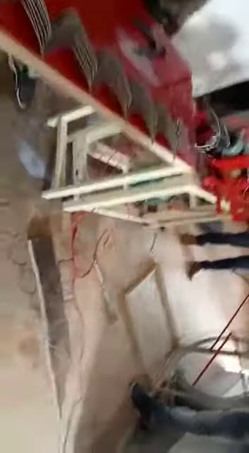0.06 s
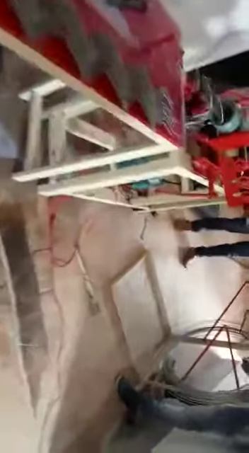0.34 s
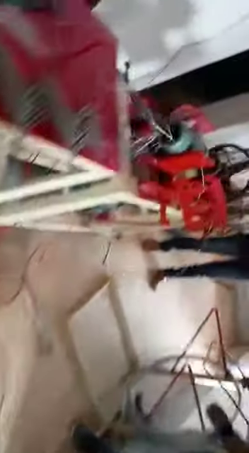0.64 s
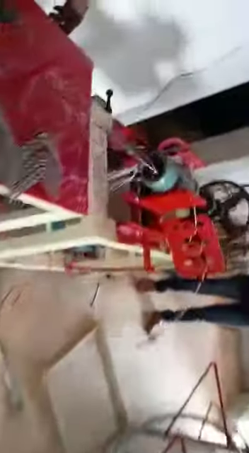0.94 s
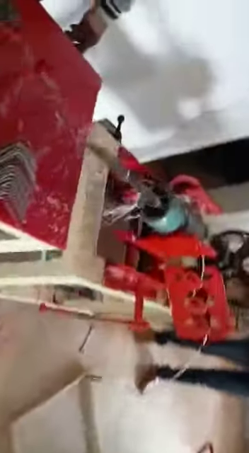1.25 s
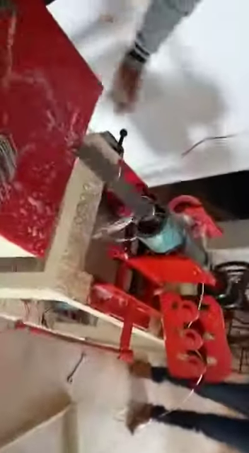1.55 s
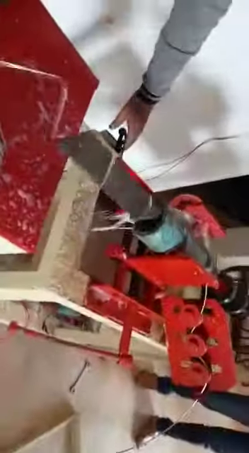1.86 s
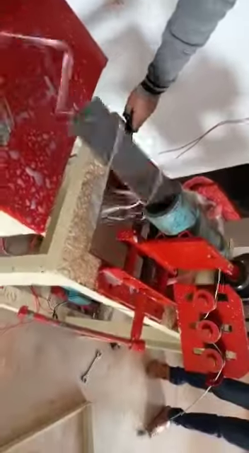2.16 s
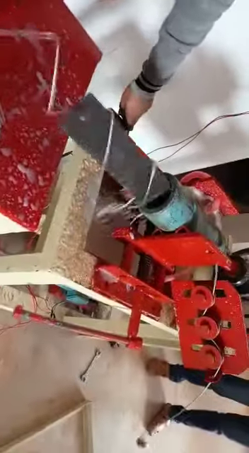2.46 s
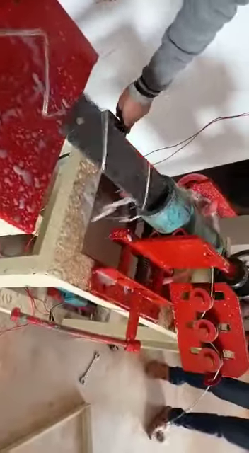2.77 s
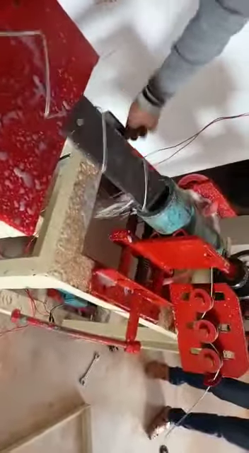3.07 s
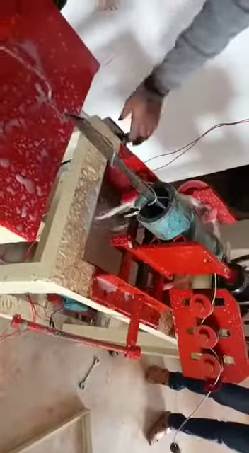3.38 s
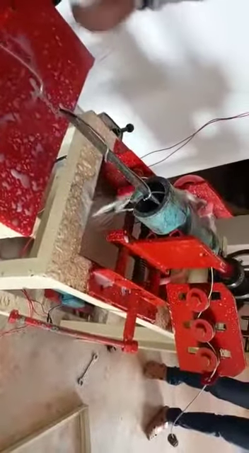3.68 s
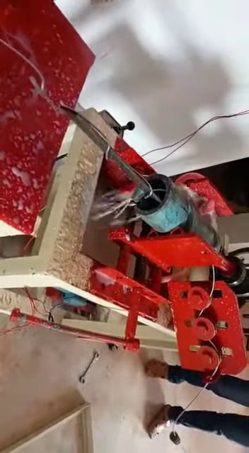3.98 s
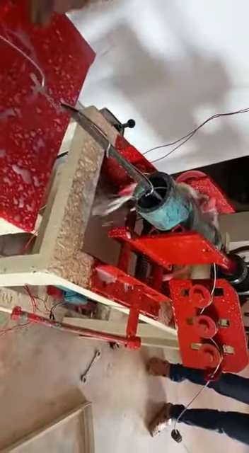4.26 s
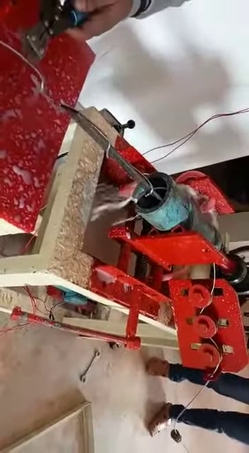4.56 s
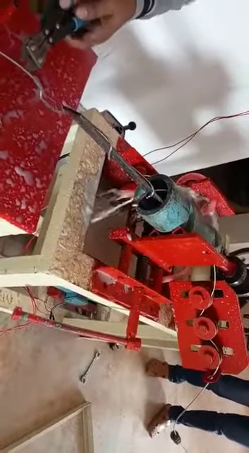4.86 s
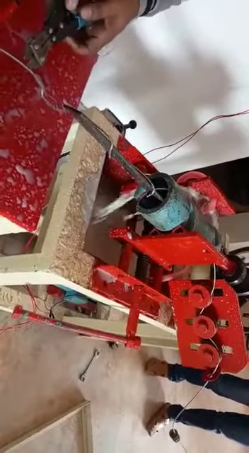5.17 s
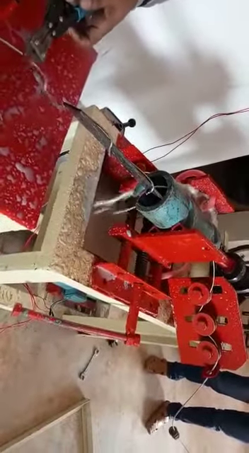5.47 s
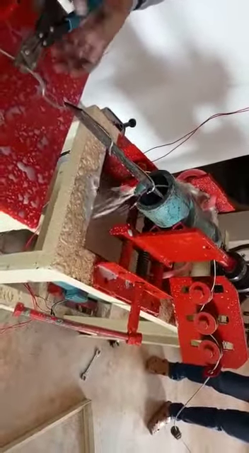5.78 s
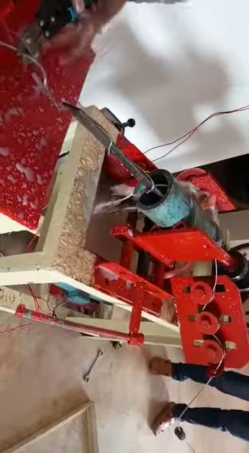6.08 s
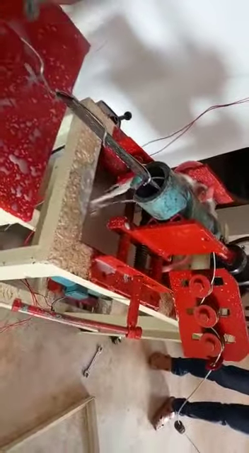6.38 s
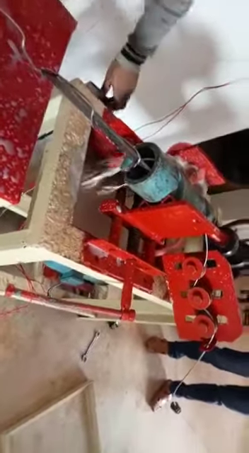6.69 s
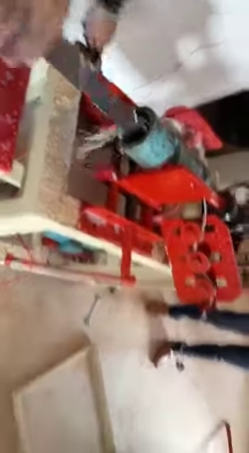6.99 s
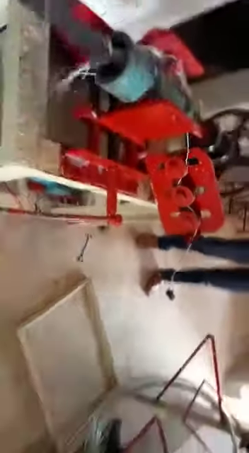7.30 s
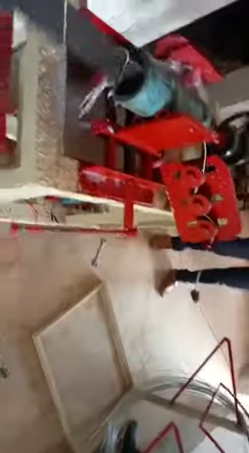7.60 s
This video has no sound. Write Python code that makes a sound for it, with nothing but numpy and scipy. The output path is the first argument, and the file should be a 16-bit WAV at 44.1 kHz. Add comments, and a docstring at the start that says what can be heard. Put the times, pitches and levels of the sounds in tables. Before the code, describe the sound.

A motor-driven wire fence machine is running from the start, about an arm's length away in a bare, slightly echoing workshop. Its steel frame clatters and booms over a low hum, while wire chatters, scrapes and slaps a turning blade with a bright ping nearly four times a second. At about 3.1 seconds the drive coasts down, with loose wire clinking until around 4 seconds. A quieter stretch follows: faint motor hum, steady hiss, light rattling and a few clinks near 4.5 and 5.6 seconds, with more around 6. At about 6.25 seconds a cutter snips the wire with one loud, sharp metallic crack. At 6.7 seconds the drive engages with a ringing clank and the hum swells. The clatter and regular pings return from about 7 seconds and carry on to the end, near 7.8 seconds.

```python
"""A chain-link fence machine

In a bare workshop, steel wire winds round a flat blade, an arm's length from a phone. On every turn
the wire slaps over the blade's edge and rattles, while the steel frame clatters and booms.
The drive is taken out of gear, the motor idles, the wire is handled and snipped, and a lever throws
the blade in again. A limiter briefly turns down the hardest blows."""
import sys
import numpy as np
from scipy import signal
from scipy.fft import rfft, irfft
from scipy.io import wavfile
from scipy.ndimage import uniform_filter1d, minimum_filter1d

SR = 44100
rng = np.random.default_rng(int(sys.argv[2]) if len(sys.argv) > 2 else 0)


def to_wav(sig):
    """Store sig (one row per channel, or 1-D mono) as 16-bit WAV at the path in sys.argv[1].

    Samples outside -1..1 are clipped; the rate is SR.
    """
    pcm = np.clip(np.atleast_2d(sig), -1, 1) * 32767
    pcm = np.round(pcm).astype(np.int16)
    wavfile.write(sys.argv[1], SR, pcm.T)  # frames by channels


N = 345744
T = np.arange(N) / SR

# How hard the drive shakes things: it runs, coasts down after 3.1 seconds and picks up again.
# Each row: time in seconds, then the levels in dB of frame clatter, table boom and wire chatter.
DRIVE_LEVELS = [(0.0, -24.5, -24.5, -25), (0.33, -25.5, -26, -23.5), (0.89, -24.5, -33, -22.5),
                (1.42, -24, -27.5, -20), (2.05, -25.5, -28, -24), (2.34, -21.5, -24.5, -23.5),
                (2.64, -28.5, -32, -24), (3.05, -25.5, -26, -21), (3.32, -31.5, -35.5, -26),
                (3.89, -33.5, -37.5, -26), (4.17, -41, -45.5, -34.5), (5.57, -48, -54.5, -34),
                (5.76, -31.5, -44, -33), (6.03, -39, -48, -35.5), (6.38, -34, -49, -27),
                (6.86, -24, -30, -22), (6.99, -29.5, -29.5, -29), (7.84, -26, -27.5, -25)]
# The wire slaps over the blade once a turn. Each row: start in seconds, ping pitch in Hz,
# ping level in dB, rattle level in dB, rattle fade time in seconds.
WIRE_SLAPS = [(0.078, 2920, -19, -15, 0.084), (0.361, 3180, -6.5, -14, 0.049),
              (0.635, 3130, -10.5, -15.5, 0.064), (0.914, 3026, -3, -17, 0.021),
              (1.182, 3130, -5.5, -14.5, 0.042), (1.456, 3520, -6.5, -16, 0.024),
              (1.735, 3160, -3.5, -13, 0.012), (2.006, 3320, -4.5, -14, 0.015),
              (2.286, 3260, -6, -16, 0.078), (2.560, 3004, -6.5, -4.5, 0.0063),
              (2.837, 3370, -5, -8, 0.015), (3.111, 2940, -4, -22, 0.029), (3.427, 3380, -14, -17, 0.039),
              (6.95, 3160, -17, -23, 0.036), (7.207, 3280, -7.5, -14.5, 0.037),
              (7.482, 3260, 0, -9.5, 0.0078), (7.763, 3204, -5, -10.5, 0.011)]
# Loose wire clinks against the table and the guides.
# Each row: start in seconds, ring level in dB, bright tick level in dB, fade time in seconds.
WIRE_CLINKS = [(0.096, -28, -36, 0.039), (0.232, -32, -34.5, 0.025), (0.420, -22, -36, 0.028),
               (0.468, -23, -28.5, 0.035), (1.141, -19, -31, 0.068), (1.195, -32, -28, 0.048),
               (1.256, -16, -31, 0.021), (1.454, -26, -25, 0.014), (1.478, -24, -23, 0.021),
               (1.662, -15.5, -28, 0.02), (1.703, -11.5, -31, 0.013), (1.845, -20, -28.5, 0.042),
               (1.963, -17, -26, 0.01), (2.302, -22, -19.5, 0.013), (2.367, -9.5, -38, 0.0046),
               (2.534, -19, -29, 0.016), (2.638, -18, -30, .02), (2.840, -33, -24, 0.035),
               (3.057, -33, -28, 0.011), (3.081, -20, -22, 0.01), (3.111, -10, -22, 0.035),
               (3.183, -13, -24, 0.033), (3.339, -21.5, -27, 0.045), (3.427, -11, -19, 0.029),
               (3.560, -20.5, -31.5, 0.062), (3.6, -15, -33, 0.049), (3.804, -20.5, -34, 0.025),
               (3.902, -15.5, -33, 0.031), (4.46, -22, -29.5, 0.041), (4.493, -16, -46, 0.036),
               (5.558, -19, -32, 0.038), (5.627, -11.5, -23, 0.031), (5.70, -25.5, -56, 0.15),
               (5.996, -17.5, -44, 0.013), (6.022, -17.5, -35, 0.031), (6.086, -18.5, -30, 0.045),
               (6.253, -20.5, -25.5, 0.11), (6.375, -22.5, -34, 0.077), (6.486, -20.5, -40, 0.033),
               (6.6665, -11.5, -29, 0.035), (6.726, -9.5, -22, 0.026), (6.769, -12.5, -26, 0.072),
               (6.948, -18.5, -31, 0.025), (7.283, -21, -27, 0.013), (7.330, -20.5, -33, 0.01),
               (7.452, -18, -36, 0.007), (7.562, -31, -32, 0.009)]
# The tone of wire hitting steel. Each row: frequency in Hz, level in dB.
CLINK_SPECTRUM = [(40, -38), (150, -50), (400, -27.5), (1400, -6), (2050, -4), (2500, 5.5), (3000, 5.5),
                  (3700, -2), (4400, -10.5), (5100, -18), (6100, -15.5), (7000, -4), (8200, -15),
                  (10000, -25), (15500, -30)]


def wire_chatter():
    """The wire chatters along the blade and its sleeve, harder after each slap."""
    # The tone of wire rattling in the sleeve. Each row: frequency in Hz, level in dB.
    sleeve_spectrum = [(200, -40), (1000, -16), (2000, -10.5), (2400, -4.5), (2900, 1.5), (3400, -2),
                       (3850, -10.5), (4400, -14.5), (5150, -42), (5700, -21.5), (7100, -13), (8000, -20),
                       (9500, -50), (16000, -40)]
    # The notes at which blade and sleeve ring. Each row: pitch in Hz, width in Hz, level in dB.
    blade_notes = [(2352, 120, 0), (2805, 35, -3), (3310, 22, -0.5), (3730, 140, -5.5), (5584, 79, -13.5),
                   (6610, 110, -16), (7150, 33, -13)]
    _, _, chatter_db = curves(DRIVE_LEVELS)
    slaps = bursts([(start, db, decay) for start, _, _, db, decay in WIRE_SLAPS], rise_s=0.0023)
    shake = np.hypot(undb(chatter_db + 2.3 * wander(40) - 2), undb(1.5) * slaps)
    sleeve = through(contacts(per_second=1800, spread_db=1.5) * shake, colour(sleeve_spectrum))
    blade = through(contacts(per_second=900, spread_db=3) * shake, resonances(blade_notes))
    rings = jangle(shake, count=600, low_hz=2269, high_hz=3886, decay_s=0.0074, spread_db=4)
    high_rings = jangle(shake, count=260, low_hz=5500, high_hz=6630, decay_s=0.009, spread_db=4)
    return undb(-1.5) * sleeve + undb(-6) * blade + rings + undb(-16) * high_rings


def wire_pings(rise_s=0.0013, damping_s=0.045):
    """The tight wire rings for a few milliseconds as it lands flat on the blade."""
    out, t = np.zeros(N), T[:SR // 20]
    swell = (t / rise_s) ** 2 * np.exp(-t / rise_s) * np.exp(-t / damping_s)
    swell /= swell.max()
    for start, hz, db, _, _ in WIRE_SLAPS:
        tones = [(hz, 0), (2440, -8), (hz * 1.14, -10)]  # pitch in Hz, level in dB
        ping = sum(undb(tone_db) * sine(tone_hz, t) for tone_hz, tone_db in tones)
        add(out, start, undb(db) * swell * ping)
    return out


def wire_tinks():
    """Now and then a free end of wire tinks or squeaks on the blade."""
    # Each row is one tink: start in seconds, pitch in Hz, level in dB, fade time in seconds.
    tinks = [(1.385, 3060, -11, 0.015), (1.616, 2980, -12, 0.022), (1.663, 3600, -3, 0.0036),
             (2.415, 2817, -7, .02), (2.975, 2850, -14, 0.034), (3.08, 2910, -8, 0.0045),
             (4.668, 3560, -20, 0.003), (5.452, 3600, -18, 0.002), (7.225, 2380, -18, .035),
             (7.563, 3770, -14.5, 0.0057)]
    out = np.zeros(N)
    for start, hz, db, decay in tinks:
        add(out, start, undb(db) * short_ring(hz, decay, rise_s=decay / 3))
    return out


def wire_clinks():
    """Loose wire hits steel once, then bounces in a short shower of tiny taps."""
    first_touch = bursts([(start, db, 0.003) for start, db, _, _ in WIRE_CLINKS], rise_s=0.00023)
    bounces = bursts([(start, db, decay) for start, db, _, decay in WIRE_CLINKS], rise_s=0.0041)
    taps = contacts(per_second=3000, spread_db=0) * np.hypot(undb(-0.5) * first_touch, bounces)
    return undb(2) * through(taps, colour(CLINK_SPECTRUM))


def wire_scrapes():
    """Wire scratches brightly at each clink, and as it drags and slips through its guides."""
    # The wire is pulled along. Each row: start in seconds, end in seconds, level in dB.
    pulls = [(0.09, 0.85, -40), (0.92, 2.25, -40), (2.63, 2.72, -40.5), (2.86, 3.2, -43.5),
             (3.53, 3.44, -48), (6.28, 6.53, -54), (6.75, 6.88, -50), (7.18, 7.34, -44), (7.72, 7.84, -49)]
    # The tone of a sharp scratch on steel. Each row: frequency in Hz, level in dB.
    scratch_spectrum = [(2000, -41), (5100, -13), (5700, 6.5), (7000, 9.5), (8200, 1.5), (9300, -1.5),
                        (12500, 1.5), (14000, -1), (15500, -2.5)]
    ticks = bursts([(start, db, decay) for start, _, db, decay in WIRE_CLINKS], rise_s=0.00022)
    slip_rows = [(when * T[-1], 16 * size, 0.009) for when, size in rng.random((210, 2))]
    slips = unit(bursts(slip_rows, rise_s=0.00044))
    drag = np.hypot(undb(2.5) * slips, undb(1.5))  # sudden slips on top of a steady rub
    force = np.hypot(undb(2) * ticks, spells(pulls, attack_s=0.017, release_s=0.1) * drag)
    scratch = through(contacts(per_second=1500, spread_db=-1.5) * force, colour(scratch_spectrum))
    sparkle = jangle(force, count=2000, low_hz=5400, high_hz=15000, decay_s=0.002, spread_db=4)
    return undb(0.3) * scratch + undb(-6.5) * sparkle


def heavy_blows(crack_s=0.0019):
    """The cutter snips, then the drive engages: each thuds through the table, cracks and rings."""
    # Each row is one blow: start in seconds, thud pitch in Hz, thud level in dB,
    # thud fade time in seconds, level of ring and crack in dB.
    blows = [(6.2507, 234, 7, 0.00073, 7), (6.727, 230, -9, 0.0069, -3)]
    # The notes of struck wire. Each row: pitch in Hz, level in dB, seconds to fade by 60 dB.
    wire_notes = [(790, -19, 0.1), (2540, -4, 0.036), (2650, -4, 0.074), (2870, -5, .1), (3520, -13, .08),
                  (3740, -3.5, 0.065), (3950, -11, .1), (4450, -17, .08), (6840, -8, 0.046),
                  (7330, -18, .05), (7700, -8, .06)]
    out, t = np.zeros(N), T[:SR // 4]
    for start, thud_hz, thud_db, decay, ring_db in blows:
        ring = sum(undb(db - 60 * t / fade) * sine(hz, t) for hz, db, fade in wire_notes)
        noise = rng.standard_normal(len(t)) * np.exp(-t / crack_s)
        crack = np.convolve(noise, colour(CLINK_SPECTRUM, size=256))[:len(t)]
        thud = high_pass(np.exp(-t / decay) * np.sin(2 * np.pi * thud_hz * t + 1), hz=90, order=1)
        metal = undb(-13.5) * ring + undb(-6) * crack
        add(out, start, undb(thud_db) * thud + undb(ring_db) * metal)
    return out


def shaking_forces(clank_s=0.098, boom_s=0.093, knock_s=0.1):
    """The drive and its jolts shake frame and table; each clink of wire also knocks the frame."""
    # The blade catches and jolts the machine.
    # Each row: start in seconds, frame clank level in dB, table boom level in dB.
    jolts = [(0.061, -18, -13), (0.19, -36, -20), (0.358, -13.5, -17.5), (0.634, -18.5, -22.5),
             (1.075, -22.5, -28), (1.185, -18.5, -21.5), (1.45, -35, -23), (1.745, -24.5, -33),
             (2.283, -20.5, -18.5), (2.835, -22.5, -19), (3.11, -30, -30), (5.62, -27.5, -36),
             (6.723, -21.5, -18), (7.21, -19.5, -31), (7.36, -25, -19), (7.63, -24, -23)]
    clatter_db, boom_db, _ = curves(DRIVE_LEVELS)
    clanks = bursts([(start, db, clank_s) for start, db, _ in jolts], rise_s=0.0032)
    booms = bursts([(start, db, boom_s) for start, _, db in jolts], rise_s=0.0079)
    knocks = bursts([(start, db - 14, knock_s) for start, db, _, _ in WIRE_CLINKS], rise_s=0.0061)
    frame_force = np.sqrt(undb(clatter_db - 0.35) ** 2 + clanks ** 2 + knocks ** 2)
    table_force = np.hypot(undb(boom_db + 1), booms)
    return frame_force, table_force


def frame_and_table(frame_force, table_force):
    """Loose gears and bearings knock the frame: its struts ring briefly and the table top booms."""
    # The tone of the clattering frame. Each row: frequency in Hz, level in dB.
    frame_spectrum = [(25, -37), (45, -43), (70, -14.5), (120, -2), (165, -13.5), (240, -2), (330, 1.5),
                      (700, 1.5), (1000, -.5), (1350, -2), (1800, 0), (2400, -12.5), (4500, -27.5),
                      (16000, -35)]
    # The notes of the sheet-steel table. Each row: pitch in Hz, width in Hz, level in dB.
    table_notes = [(198, 6.9, -4), (288, 8.4, -13.5), (313.7, 14.6, -1.5), (335, 8.8, 3), (358, 11.4, 2),
                   (385, 27, -1.5), (409.3, 7.5, -22.5), (522, 26, -20.5), (613, 5.8, -20)]
    knocks = contacts(per_second=1300, spread_db=3) * frame_force * undb(1.34 * wander(45))
    clatter = through(knocks, colour(frame_spectrum))
    struts = jangle(frame_force, count=420, low_hz=430.3, high_hz=1099, decay_s=0.015, spread_db=2.5)
    boom = through(contacts(per_second=700, spread_db=1.5), resonances(table_notes)) * table_force
    return undb(-1.34) * clatter + undb(-1.5) * struts + undb(0.4) * boom


def motor_hum(idle_db=-49):
    """Motor and belt hum; the hum swells while winding, as the clutch lets out, and on run-up."""
    # The hum swells. Each row: start in seconds, end in seconds, level in dB.
    swells = [(0.0, 1.85, -44), (1.88, 2.48, -41), (3.6, 3.97, -40), (6.73, 7.2, -37)]
    # The rough tones of motor and belt. Each row: pitch in Hz, width in Hz, level in dB.
    hum_notes = [(75.5, 5.8, -8), (89.4, 33, -0.5), (114.5, 5.4, 6), (133.8, 7.2, 0)]
    loudness = np.hypot(undb(idle_db), spells(swells, attack_s=0.067, release_s=0.11))
    return through(rng.standard_normal(N), resonances(hum_notes, size=16384)) * loudness


def background_hiss(loud_from_s=3.4, loud_until_s=6.4, fade_s=0.25):
    """A steady background hiss, louder in the quiet stretch while the machine idles."""
    # The tone of the hiss. Each row: frequency in Hz, level in dB.
    hiss_spectrum = [(25, -20), (70, -1), (130, -8), (230, -2), (330, -20), (1500, -15), (2600, 14.5),
                     (3400, -7), (5000, -25), (7100, -4.5), (9200, -14.5), (15500, -11.5)]
    dip = np.clip((loud_from_s - T) / fade_s, 0, 1) + np.clip((T - loud_until_s) / fade_s, 0, 1)
    hiss_db = -36 - 6 * dip + 0.96 * wander(28)
    return undb(hiss_db) * through(rng.standard_normal(N), colour(hiss_spectrum))


def workshop_echo(sound, echo_db, low_fade_s=0.78, high_fade_s=0.46, rise_s=0.0021, patterns=5):
    """Bare floor and walls echo, the treble dying first; the pattern shifts as the phone moves."""
    t, echo = T[:SR // 2], 0
    for k in range(patterns):
        noise = rng.standard_normal(len(t))
        low = low_pass(noise, hz=4500, order=2)
        tail = low * undb(-60 * t / low_fade_s) + (noise - low) * undb(-60 * t / high_fade_s)
        tail *= 1 - np.exp(-(t / rise_s) ** 2)
        # each echo pattern blends into the next
        share = np.sqrt(np.maximum(1 - np.abs(T / T[-1] * (patterns - 1) - k), 0))
        echo += share * through(sound, unit(tail) / np.sqrt(len(t)))
    return sound + undb(echo_db) * echo


def jangle(shake, count, low_hz, high_hz, decay_s, spread_db):
    """The free length of metal changes with every touch, so each touch rings at its own pitch."""
    out = np.zeros(N)
    for when, pitch, size, hold in rng.random((count, 4)):
        i = int(when * (N - 1))
        hz = low_hz + (high_hz - low_hz) * pitch
        gain = shake[i] * undb(spread_db * (2 * size - 0.5))
        add(out, i / SR, gain * short_ring(hz, decay_s * (0.5 + hold)))
    return out


def short_ring(hz, decay_s, rise_s=0.0013, overtone_ratio=2.3):
    """A length of metal bends to and fro, giving a brief note and a quieter, higher one."""
    t = T[:SR // 8]
    tone = np.sin(2 * np.pi * hz * t)
    if hz * overtone_ratio < SR / 2:
        tone += undb(-16) * np.sin(2 * np.pi * hz * overtone_ratio * t)
    return tone * (1 - np.exp(-t / rise_s)) * np.exp(-t / decay_s)


def contacts(per_second, spread_db):
    """Metal taps on metal at random moments and with uneven strength."""
    touching = rng.random(N) < per_second / SR
    strength = undb(spread_db * np.clip(rng.standard_normal(N), -2, 2))
    return unit(touching * strength * np.sign(rng.standard_normal(N)))


def bursts(rows, rise_s):
    """Loudness that jumps up and fades. Each row: start in seconds, level in dB, fade in seconds."""
    power = np.zeros(N)
    t = T[:SR // 2]
    for start, db, decay in rows:
        add(power, start, (undb(db) * (1 - np.exp(-t / rise_s)) * np.exp(-t / decay)) ** 2)
    return np.sqrt(power)


def spells(rows, attack_s, release_s):
    """Loudness that swells, holds and fades. Each row: start and end in seconds, level in dB."""
    power = np.zeros(N)
    for start, end, db in rows:
        swell = np.clip((T - start) / attack_s, 0, 1)
        fade = np.exp(-np.maximum(T - end, 0) / release_s)
        power += (undb(db) * swell * fade) ** 2
    return np.sqrt(power)


def curves(rows):
    """Join a table's rows with straight lines; the first column is the time in seconds."""
    times, *columns = np.transpose(rows)
    return [np.interp(T, times, column) for column in columns]


def wander(per_second):
    """A smooth random drift with a typical size of 1."""
    hold = max(int(SR / per_second), 2)
    steps = np.repeat(rng.standard_normal(N // hold + 1), hold)
    return unit(uniform_filter1d(uniform_filter1d(steps, hold), hold)[:N])


def colour(spectrum, size=4096):
    """How an object with this spectrum sounds after a single tap."""
    hz, db = np.transpose(spectrum)
    grid_hz = np.maximum(np.arange(size // 2 + 1) * SR / size, 1)
    gains = undb(np.interp(np.log(grid_hz), np.log(hz), db))
    # folding the cepstrum (the log spectrum turned back into time) puts all sound after the tap
    cepstrum = irfft(np.log(gains))
    cepstrum[1:size // 2] *= 2
    cepstrum[size // 2 + 1:] = 0
    return unit(irfft(np.exp(rfft(cepstrum)))) / np.sqrt(size)


def resonances(notes, size=8192):
    """How an object with these notes rings after a single tap; narrow notes last longer."""
    t = T[:size]
    ring = sum(undb(db) * width * np.exp(-np.pi * width * t) * np.cos(2 * np.pi * hz * t)
               for hz, width, db in notes)
    return unit(ring) / np.sqrt(size)


def through(force, response):
    """Pass a force through an object, given its response to one tap."""
    return signal.oaconvolve(force, response)[:N]


def sine(hz, t):
    """A pure tone that starts at a random point in its cycle."""
    return np.sin(2 * np.pi * hz * t + rng.uniform(0, 2 * np.pi))


def add(track, start_s, sound):
    """Mix a sound into the track."""
    i = int(start_s * SR)
    track[i:i + len(sound)] += sound[:N - i]


def undb(db):
    """Turn decibels into a multiplier."""
    return 10 ** (np.asarray(db) / 20)


def unit(x):
    """Scale to an average power of 1."""
    return x / np.sqrt(np.mean(x ** 2))


def high_pass(x, hz, order=2):
    """Thin the bass."""
    return signal.sosfilt(signal.butter(order, hz, "high", fs=SR, output="sos"), x)


def low_pass(x, hz, order):
    """Dull the treble."""
    return signal.sosfilt(signal.butter(order, hz, fs=SR, output="sos"), x)


def limiter(x, ceiling=0.82, ahead_s=0.026, smooth_s=0.0015):
    """The volume sinks shortly before a peak and comes back right after it."""
    ahead, smooth = int(ahead_s * SR) | 1, int(smooth_s * SR) | 1  # odd numbers of samples
    needed_gain = np.minimum(ceiling / (np.abs(x).max(axis=0) + 1e-9), 1)
    held_gain = minimum_filter1d(needed_gain, ahead, origin=-(ahead // 2))
    return x * np.exp(uniform_filter1d(np.log(held_gain), smooth, origin=smooth // 2))


def scene():
    """The whole machine, the same in both ears; pings, blows, hum and hiss have no echo."""
    rattle = frame_and_table(*shaking_forces()) + wire_chatter() + wire_tinks()
    running = low_pass(rattle, hz=9000, order=3) + wire_clinks() + wire_scrapes()
    in_room = undb(-0.5) * workshop_echo(running, echo_db=-7.5)
    mono = in_room + wire_pings() + heavy_blows() + motor_hum() + background_hiss()
    return np.array([mono, mono])


def record(dry):
    """The phone thins the deep bass, limits the peaks and cuts the highest treble."""
    treble_cut = signal.ellip(10, 0.2, 70, 15600, fs=SR, output="sos")
    return signal.sosfilt(treble_cut, limiter(high_pass(dry, hz=54)))


dry = scene()
out = record(dry)
to_wav(out)
```